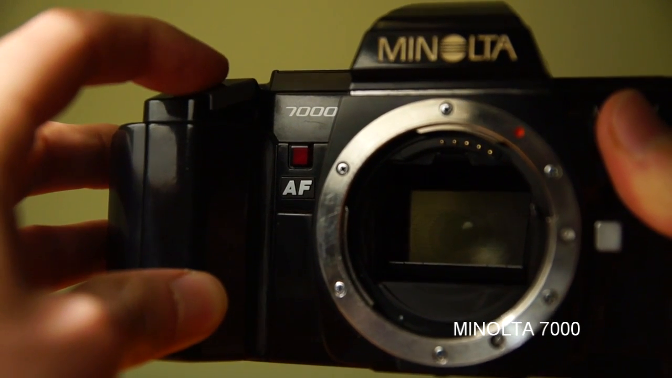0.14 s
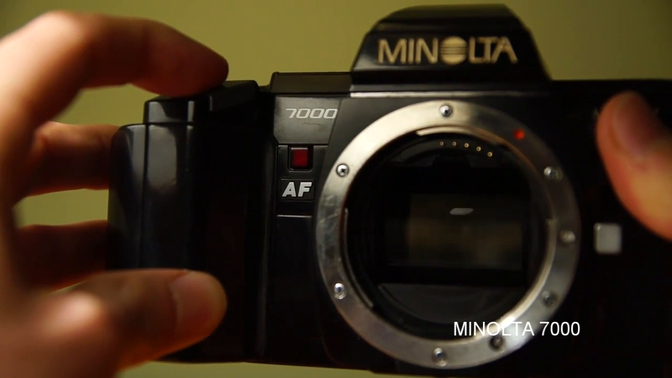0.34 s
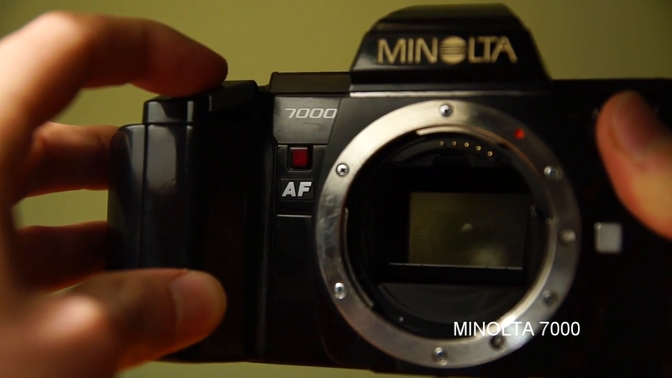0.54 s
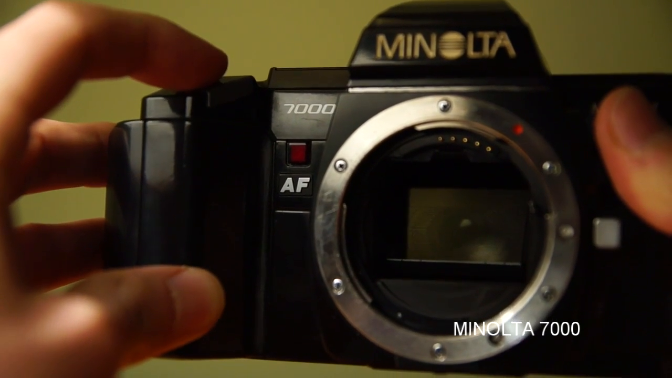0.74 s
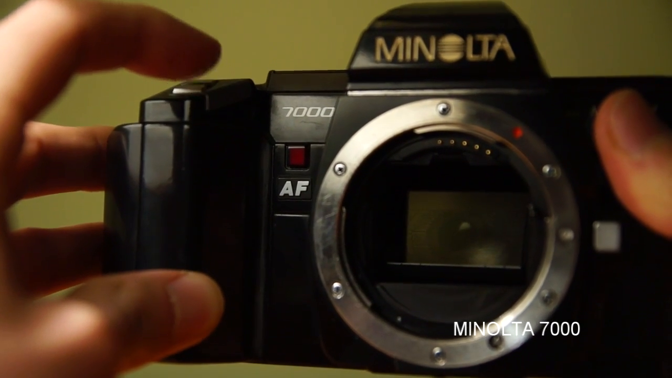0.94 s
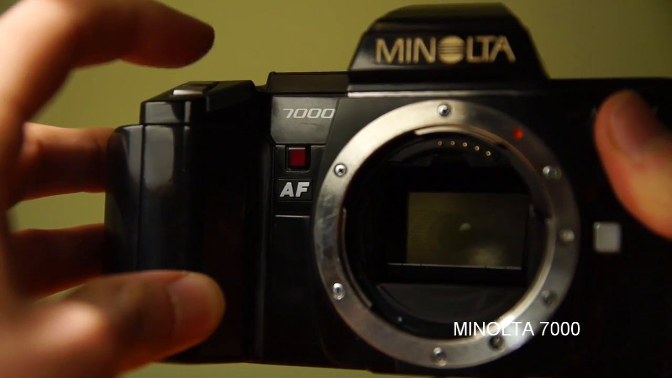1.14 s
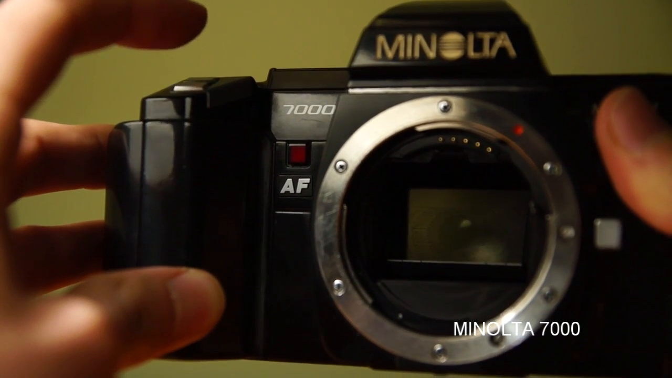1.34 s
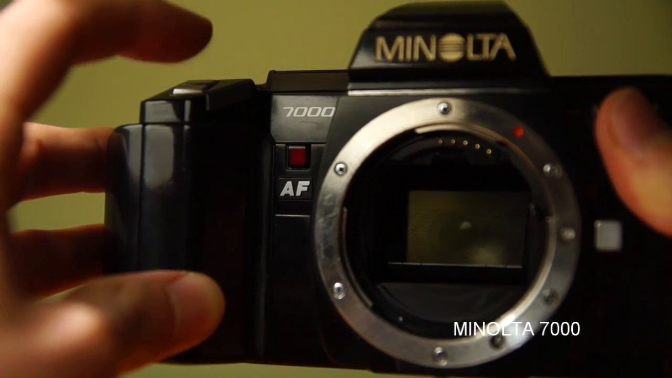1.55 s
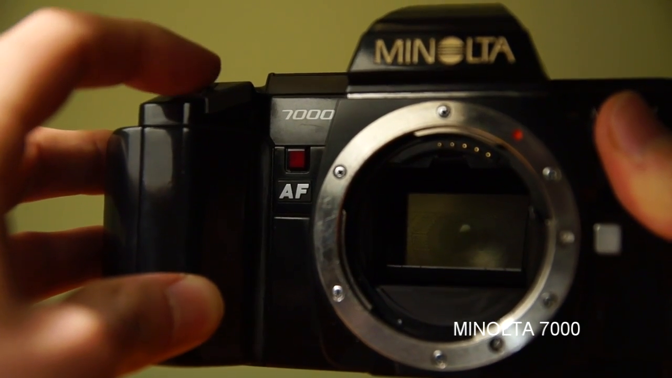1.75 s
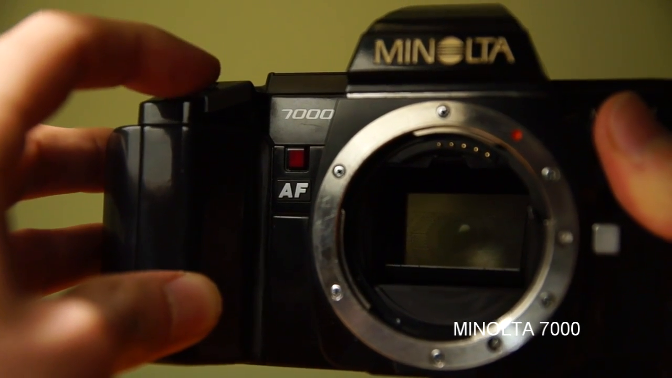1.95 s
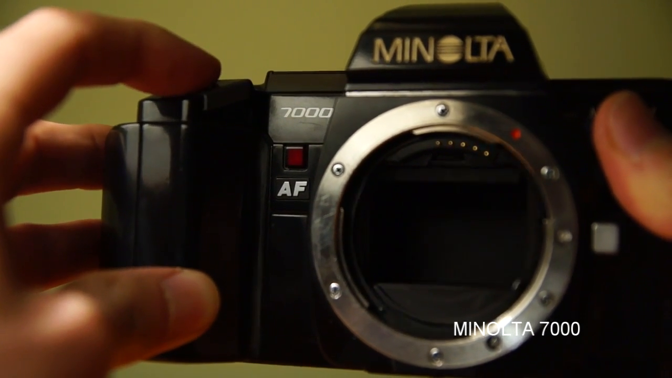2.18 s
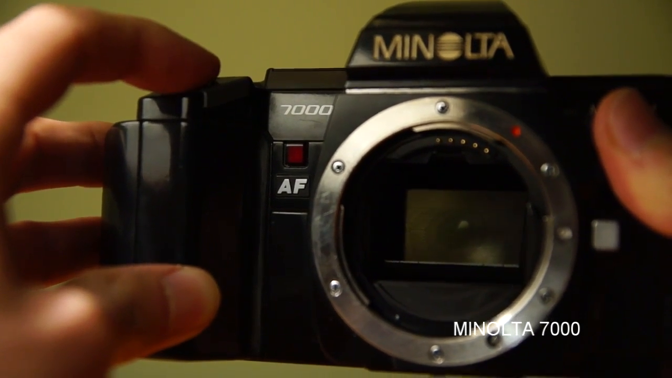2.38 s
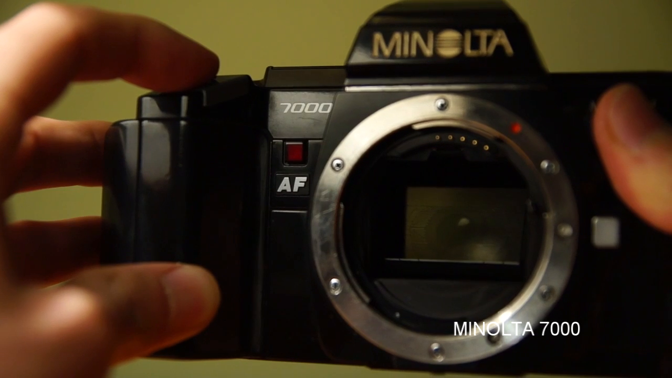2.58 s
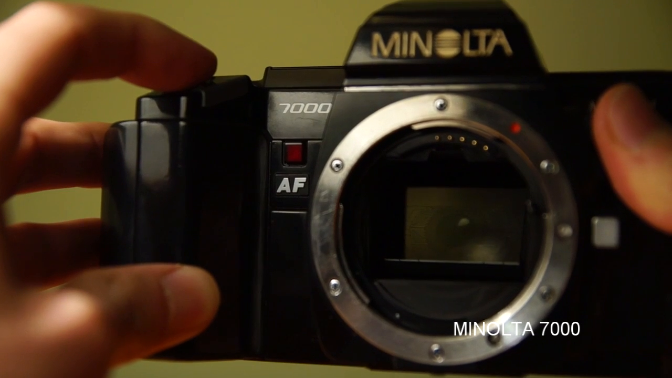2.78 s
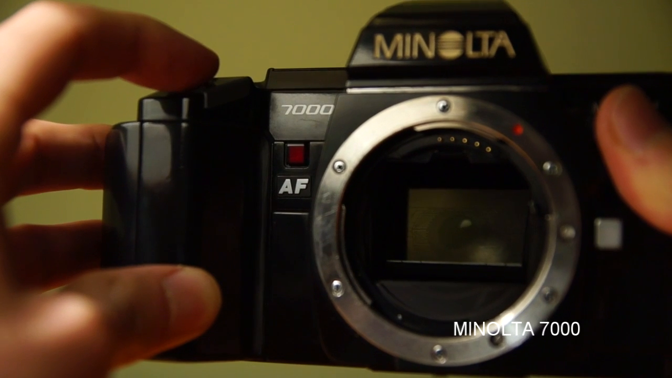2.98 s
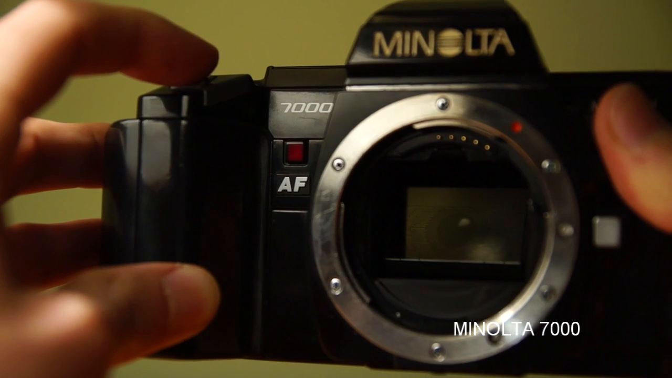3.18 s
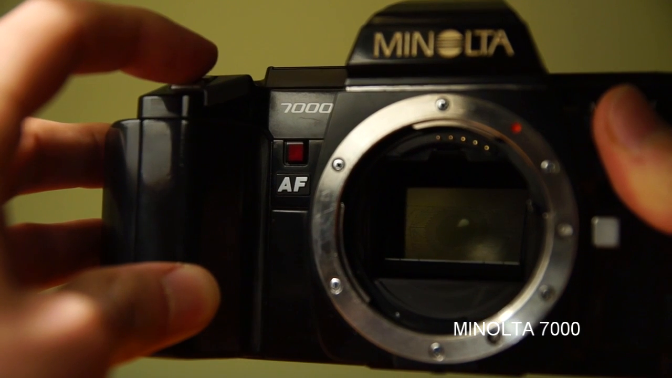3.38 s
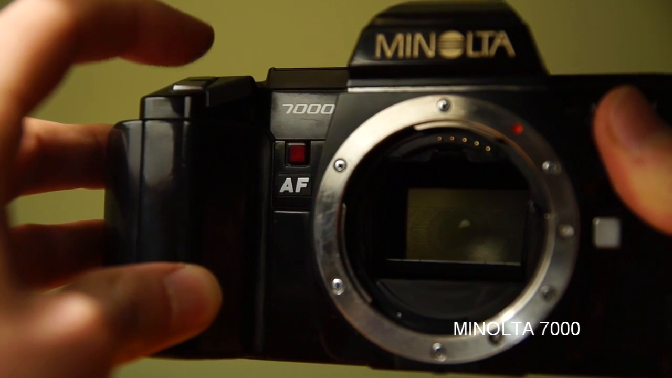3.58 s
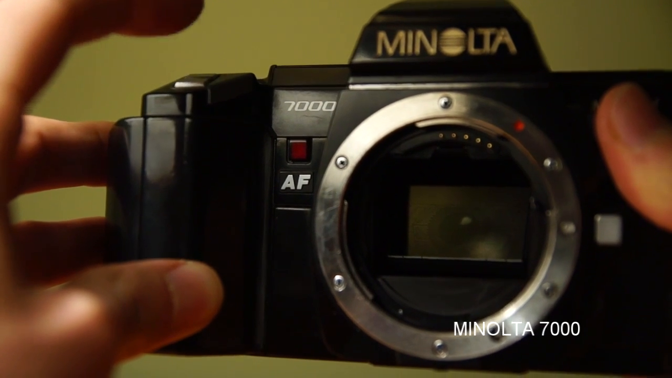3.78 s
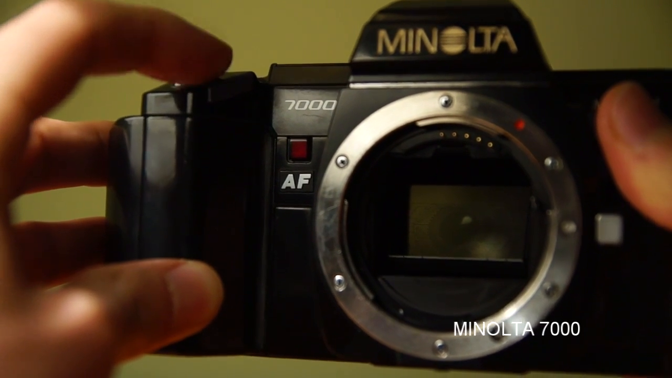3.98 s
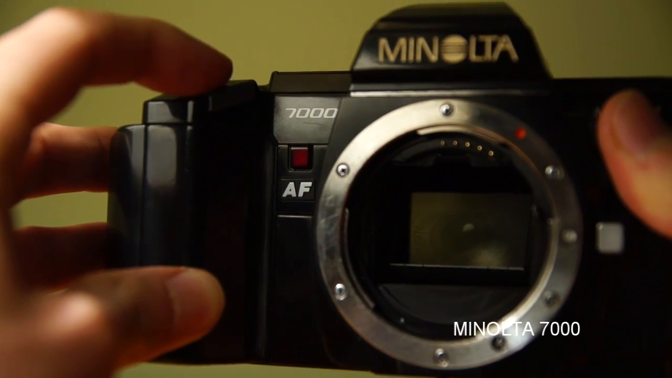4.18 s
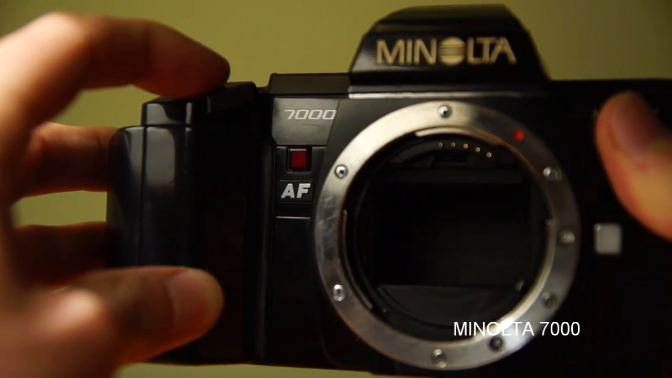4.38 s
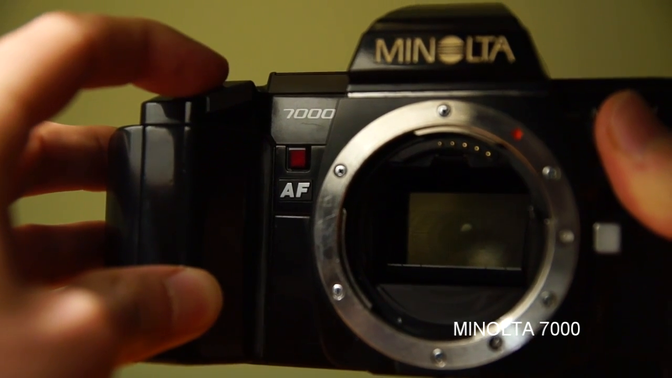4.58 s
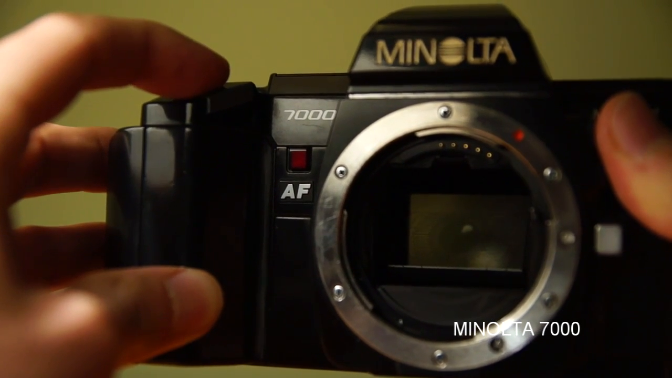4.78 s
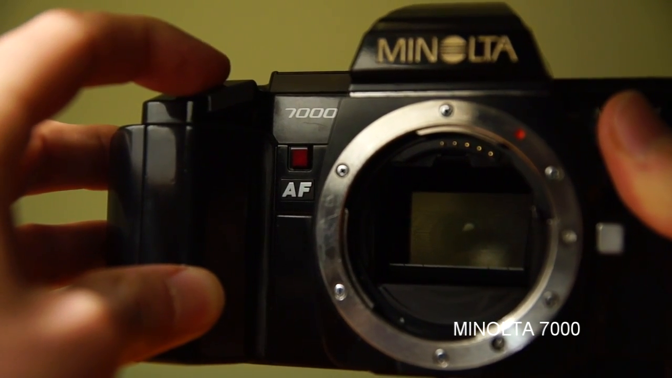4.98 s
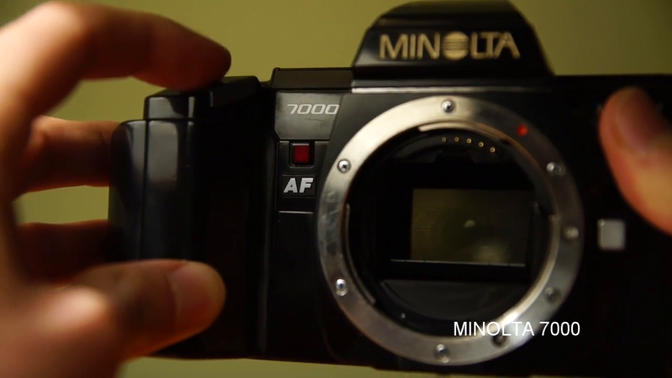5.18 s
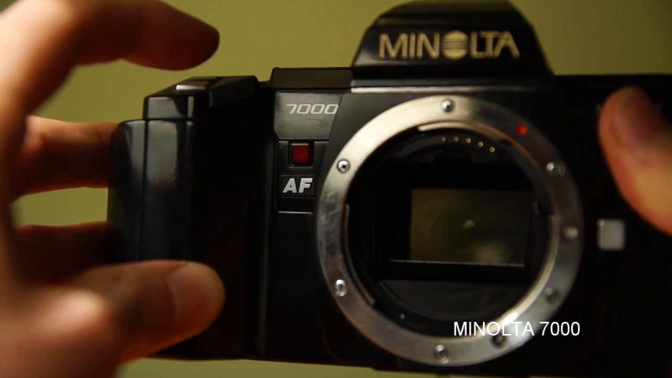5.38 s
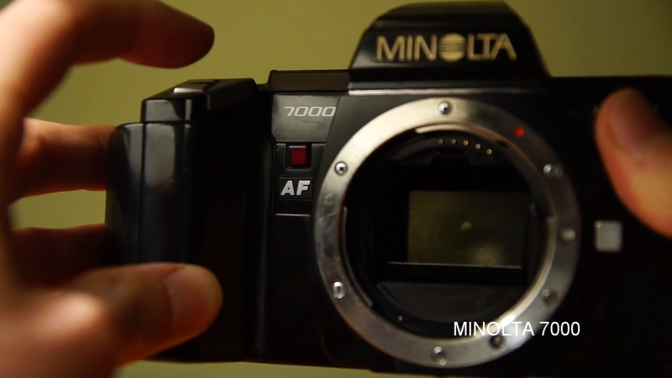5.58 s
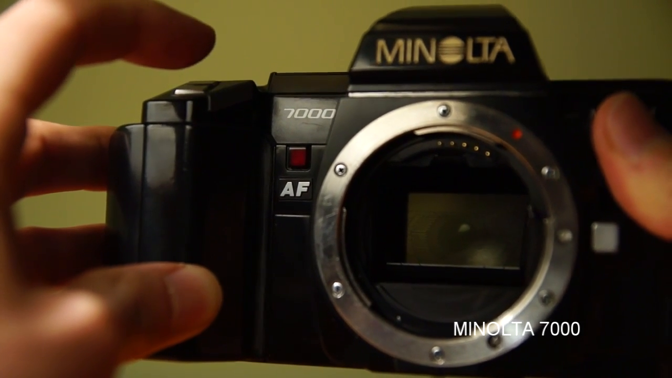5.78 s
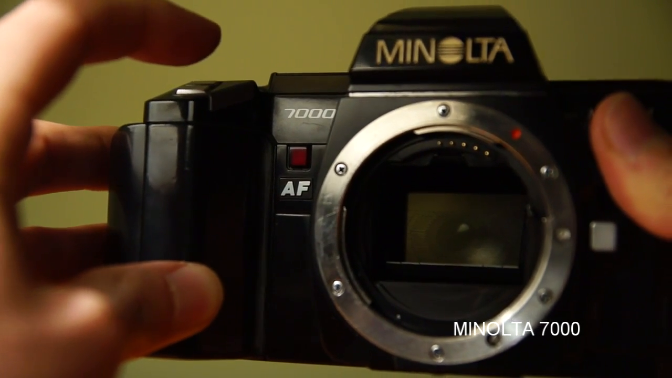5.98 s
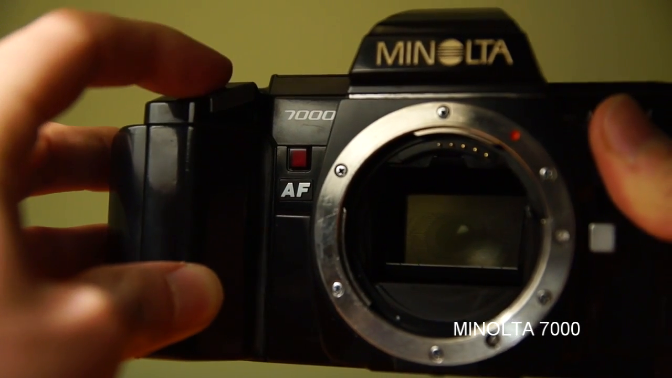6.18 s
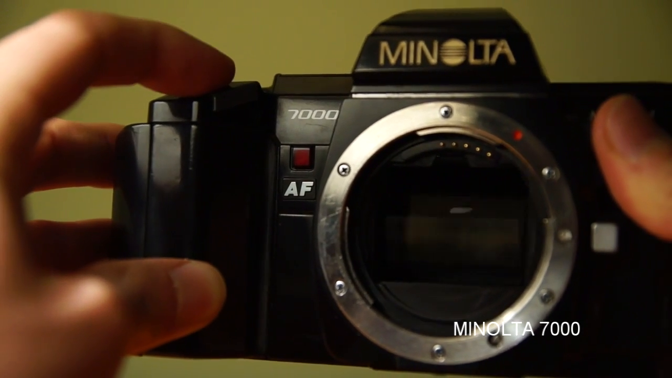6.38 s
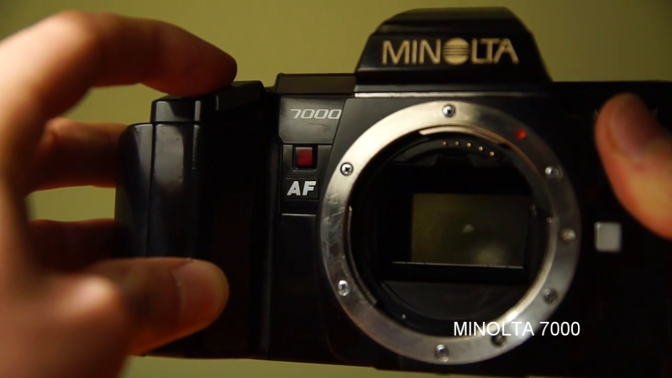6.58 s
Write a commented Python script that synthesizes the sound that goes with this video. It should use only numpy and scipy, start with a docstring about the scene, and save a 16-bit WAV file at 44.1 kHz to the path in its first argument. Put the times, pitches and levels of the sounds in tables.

```python
"""A motor-wound reflex camera with no lens is fired four times, close by in a quiet room.
Hiss and a faint rumble run throughout. In each release the gears lift the mirror, the shutter blinds snap,
the mirror drops, and the motor cocks the springs until they latch; two springs then sing on faintly.
Gears are noise shaped by the shell; parts are clicks and noise bursts that ring the chassis.
Between releases a fingertip makes small ticks on the button. Sparse random echoes make the room."""
import sys
import numpy as np
from scipy import signal
from scipy.fft import rfft, irfft, next_fast_len
from scipy.io import wavfile
from scipy.ndimage import uniform_filter1d

SR = 44100
rng = np.random.default_rng(int(sys.argv[2]) if len(sys.argv) > 2 else 0)


def waveform_to_disk(signal):
    """Save audio, clipped to [-1, 1], as 16-bit WAV at the path in sys.argv[1]."""
    frames = np.transpose(np.atleast_2d(signal))
    scaled = np.clip(frames, -1, 1) * 32767
    samples = np.round(scaled).astype(np.int16)
    wavfile.write(sys.argv[1], SR, samples)


N = 292824  # length in samples
SIZE = next_fast_len(N + SR)  # padded length for filtering
HZ = np.fft.rfftfreq(SIZE, 1 / SR)

# The four releases. Each row: shutter time in seconds, extra delay of the motor start in seconds,
# extra delay of the mirror drop in seconds, strength of the blows in dB, first and second spring level in dB.
RELEASES = [(.3417, -0.0031, 0.005, 0, -60, -59.5), (2.2694, -0.0012, 0.0033, -0.5, -67, -67),
            (4.447, -0.00051, .001, 0, -58.5, -65), (6.5309, -0.0024, -0.00049, 0, -62, -62)]
# The motor over one release. Each row: seconds from the shutter, gear level in dB,
# low range over the gear level in dB, whine pitch in Hz.
MOTOR = [(-.128, -72, 5, 4200), (-.09, -31.5, -2, 4900), (-.03, -24.5, -2.5, 4350), (-.012, -44.5, 6, 4300),
         (.02, -36.5, 1.5, 4200), (.035, -28, 1, 4250), (.05, -28, 3, 4350), (.07, -27.5, -1, 4814),
         (.095, -24.5, 3, 4585), (.112, -35.5, 6.5, 4200), (.26, -33.5, 1.5, 4084), (.285, -47, -6, 3810),
         (.35, -67, -17, 3960)]


def gain_of(db):
    """Turns decibels into a factor."""
    return 10 ** (np.asarray(db) / 20)


def evened(x):
    """Scales a signal to an RMS level of 1."""
    return x / np.sqrt(np.mean(x ** 2) + 1e-20)


def unit(response):
    """Scales a filter so that white noise keeps its level."""
    return response / np.sqrt(np.mean(abs(response) ** 2))


def read(points):
    """Reads a spectrum table at every frequency, in straight lines on a log axis."""
    f, value = np.transpose(points)
    return np.interp(np.log(HZ + 1), np.log(f + 1), value)


def shaped(x, response):
    """Filters a signal by multiplying its spectrum."""
    return irfft(rfft(x, SIZE) * response, SIZE)[..., :N]


def peak(hz, width):
    """A resonance with gain 1 at its centre, ringing only after it is struck."""
    return 1j * HZ * width / (hz ** 2 - HZ ** 2 + 1j * HZ * width)


def pair(same_points):
    """Two channels of white noise, more or less alike at each frequency."""
    a, b = rng.standard_normal((2, N))
    same = np.clip(read(same_points), 0, 1)
    right = shaped(a, same) + shaped(b, np.sqrt(1 - same ** 2))
    return np.array([a, right])


def timed(s, release):
    """Turns times from the shutter into clock times, with this release's own delays."""
    shutter, start_late, drop_late = release[:3]
    starting = s < -.07
    dropping = (s > .02) & (s < .04)
    return shutter + s + start_late * starting + drop_late * dropping


def each_release(rows):
    """Plays a one-release table at every release; also tells when a release is on."""
    s, *columns = np.transpose(rows)
    times = np.concatenate([timed(s, r) for r in RELEASES])
    t = np.arange(N) / SR
    on = sum((t > timed(s, r)[0]) & (t < timed(s, r)[-1]) for r in RELEASES)
    return on, [np.interp(t, times, np.tile(c, len(RELEASES))) for c in columns]


def hiss(level_db=-60):
    """Steady noise: room tone below, microphone hiss above."""
    # Spectrum before levelling. Each row: frequency in Hz, relative level in dB.
    colour = [(20, -27.5), (60, -42), (150, -20), (190, -10), (215, -2), (500, -1), (900, 0.5), (1800, -6),
              (4000, -6.5), (8000, -17), (14000, -23.5)]
    # Each row: frequency in Hz, left-right likeness from 0 to 1.
    likeness = [(100, 0.82), (300, 0.586), (700, 0.21), (3000, 0.14), (10000, .03)]
    return gain_of(level_db) * evened(shaped(pair(likeness), gain_of(read(colour))))


def rumble(hum_hz=226.1, hum_db=-78, bumps_db=-83, lumps_per_s=9, half_lump_s=0.023):
    """A faint wavering hum from narrow noise, and low bumps of noise that come and go."""
    hum = shaped(rng.standard_normal(N), peak(hum_hz, 5.66))
    starts = (rng.random(N) < lumps_per_s / SR) * rng.uniform(.4, 1, N)
    lumps = signal.oaconvolve(starts, np.hanning(2 * int(half_lump_s * SR)))[:N]
    swell = lumps + 0.089  # never quite silent
    bumps = shaped(swell * rng.standard_normal(N), 1 / (1 + (HZ / 150) ** 6))
    return gain_of(hum_db) * evened(hum) + gain_of(bumps_db) * evened(bumps)


def room(x, gap=300, spacing=20):
    """Sparse echoes of random sign (gap, spacing in samples); each band dies at its own speed."""
    # Each row: frequency in Hz, seconds to fall by 60 dB.
    decay_times = [(300, 0.21), (800, 0.33), (2000, 0.23), (5500, 0.22), (12000, 0.18)]
    taps = np.zeros((2, SR // 2))
    at = np.arange(gap, SR // 2 - spacing, spacing).astype(int)
    at = at + rng.integers(0, spacing, (2, len(at)))
    np.put_along_axis(taps, at, rng.choice([-1., 1.], at.shape), 1)
    taps[1] = 0.46 * taps[0] + 0.9 * taps[1]  # the two sides are partly alike
    hz, t, bands = signal.stft(taps, SR, nperseg=256)
    t60 = np.interp(hz, *np.transpose(decay_times))[:, None]
    tail = signal.istft(bands * gain_of(-60 * t / t60), SR, nperseg=256)[1]
    return signal.fftconvolve(x, tail / np.linalg.norm(tail[0]), axes=1)[:, :N]


def finger(width=800, hollow_hz=2850, dull_hz=1900):
    """Small plastic ticks: fading noise through a hollow ring and a dull body, plus a thin bright edge."""
    # Levels are those of the noise before filtering. Each row: start in seconds, ring level in dB,
    # fading time in seconds, edge level in dB, dull body level in dB.
    ticks = [(0.9714, -44, 0.004, -75, -58), (2.707, -33, 0.0033, -72, -38), (2.846, -51, 0.004, -72, -49),
             (3.1572, -43, 0.0032, -55, -54), (3.4615, -45, 0.0043, -73, -55),
             (4.8536, -30.5, 0.0045, -55, -34), (5.131, -45, 0.004, -74, -47),
             (5.2714, -41, 0.0037, -71, -48), (5.288, -34, 0.0056, -71, -45),
             (6.181, -39, 0.0046, -75, -56)]
    out, t = np.zeros((2, N)), np.arange(1500) / SR
    noise = rng.standard_normal((len(ticks), 2, len(t)))
    hollow, dull = (signal.iirpeak(f, f / width, SR) for f in (hollow_hz, dull_hz))
    for (s, ring_db, fade, edge_db, body_db), (a, b) in zip(ticks, noise):
        rub = np.array([a, 0.86 * a + 0.65 * b]) * np.exp(-t / abs(fade))
        # each filter is used twice to sharpen it
        ring, body = (signal.lfilter(*f, signal.lfilter(*f, rub)) for f in (hollow, dull))
        edge = np.diff(rub, prepend=0)
        tick = gain_of(ring_db) * ring + gain_of(body_db) * body + gain_of(edge_db) * edge
        out[:, round(s * SR):][:, :len(t)] += tick
    return out


def springs(latch_s=.264):
    """Two thin tones, plucked by the last latch, that die slowly after each release."""
    # Each row: frequency in Hz, seconds to fall by 60 dB.
    tones = [(979, 1.2), (1243.5, 1.5)]
    out, t = np.zeros(N + 2 * SR), np.arange(SR) / SR
    for release in RELEASES:
        start = round((release[0] + latch_s) * SR)
        for db, (hz, t60) in zip(release[4:], tones):
            tone = np.sin(2 * np.pi * (hz * t + rng.random()))
            out[start:][:SR] += gain_of(db - 60 * t / t60) * tone
    return out[:N]


def shutter_hum(waver_hz=12):
    """A very short, faint low tone just after the shutter, its pitch wavering slightly."""
    # One row: start and stop in seconds from the shutter, fade in seconds, pitch in Hz, full level in dB.
    start, stop, fade, hz, db = (0, 0.0164, 0.13, 525, -51)
    # the fades are longer than the tone and overlap, so it stays well below its full level
    on, (swell,) = each_release([(start, 0), (start + fade, 1), (stop - fade, 1), (stop, 0)])
    waver = evened(uniform_filter1d(rng.standard_normal(N), size=1500))
    turns = 2 * np.pi * np.cumsum(hz + waver_hz * waver) / SR
    return gain_of(db) * on * swell * np.sqrt(2) * np.sin(turns)


def whine(width=250, level_db=-6.5, per_khz_db=12):
    """Slow noise carried on the motor's moving pitch, louder as the pitch climbs."""
    on, (gear_db, _, hz) = each_release(MOTOR)
    a, b = shaped(rng.standard_normal((2, N)), 1 / (1 + (HZ / width) ** 2))
    turns = 2 * np.pi * np.cumsum(hz) / SR
    # level_db is over the gear level, at a pitch of 5 kHz
    level = gain_of(gear_db + level_db + per_khz_db * (hz / 1000 - 5.0))
    return on * level * evened(a * np.cos(turns) + b * np.sin(turns))


def gears(teeth_per_s=900, ring_s=0.00091, smooth=3.4):
    """Low, middle and top envelopes of a dense whirr, roughened where single teeth meet."""
    teeth = (rng.random(N) < teeth_per_s / SR) * rng.exponential(1, N)
    clatter = signal.lfilter([1], [1, -np.exp(-1 / (ring_s * SR))], teeth)
    grain = evened(clatter) + smooth
    on, (db, low_db, _) = each_release(MOTOR)
    return on * gain_of([db + low_db, db, db - 5]) * evened(grain)


def knocks(rise=0.24, decay_power=0.92, spread_db=1.7, blow_lag=.35):
    """Each part lands with one blow and rattles briefly; gives both in low, middle and top ranges."""
    # In order: button bottoms, motor engages (2 rows), mirror swings up to its stop (2),
    # blinds and bounce (3), mirror drops and bounces (2), cocking lever takes the load (2), pawl,
    # shutter springs latch (3), mirror spring latches (2).
    # Each row: seconds from the shutter, thud, clack and tick level in dB, rattle time in seconds,
    # blow over the rattle in dB, before the tilt between ranges.
    parts = [(-.1205, -49, -51.5, -55, .004, 6), (-.112, -32, -33.5, -39, .0047, 2.5),
             (-.098, -47, -35, -42.5, .0046, 2.5), (-.0453, -32, -31, -22, .006, -3.5),
             (-.036, -32, -22, -30, .0045, 8), (-.0073, -23, -20.5, -18, .0053, 4),
             (-.0008, -29.5, -12, -20, .0031, 8.5), (.0087, -37, -39, -31.5, 0.0029, -4),
             (.0272, -24.5, -14.5, -24, .0065, 7), (.043, -21.5, -31, -34.5, 0.0045, 8.5),
             (0.0815, -15.5, -16, -19, 0.0034, 8), (0.0906, -31, -25.5, -24, 0.0051, -3.5),
             (0.185, -29.5, -20, -21.5, .0021, 2), (.2252, -23, -14.5, -16.5, 0.0028, 9.5),
             (.2285, -25.5, -15, -15.5, 0.0035, 3.5), (.2344, -24, -33, -38, .0037, -2),
             (0.256, -24, -26.5, -48, .0045, 0), (0.263, -19, -27.5, -46, 0.0044, 3)]
    rattles, blows = np.zeros((3, N + SR)), np.zeros((3, N + SR))
    t = np.arange(2000) / SR
    chance = rng.standard_normal((len(RELEASES), len(parts), 3, 1))
    for release, lucks in zip(RELEASES, chance):
        for (s, thud_db, clack_db, tick_db, rattle, blow_db), luck in zip(parts, lucks):
            # no two blows are quite alike
            levels = gain_of([[thud_db], [clack_db], [tick_db]] + spread_db * luck + release[3])
            lengths = abs(rattle) * np.array([[1.15], [1], [.8]])  # low rattles last longest
            growth = 1 - np.exp(-t / (rise * lengths))
            decay = np.exp(-(t / lengths) ** decay_power)
            at = round(timed(s, release) * SR)
            rattles[:, at:at + len(t)] += levels * growth * decay
            # the blow lands a share of the rattle time after first contact
            blows[:, at + round(blow_lag * abs(rattle) * SR)] += levels[:, 0] * gain_of(blow_db)
    return rattles[:, :N], blows[:, :N]


def camera(blow_tilt_db=(3., 0., -6.), gear_low_hz=500):
    """In three ranges, the gears shake the shell while rattles and blows ring the chassis."""
    # Spectra of the low, middle and top range. Each row: frequency in Hz, relative level in dB.
    thud, clack, tick = [(20, -17), (200, -36), (500, -19.5), (900, -9.5), (1600, -6.5), (2400, -4.5),
                         (3200, -7), (6000, -46.5)], [(800, -33), (2000, -24.5), (2800, -8), (4200, 1), (5200, -5.5),
                                       (6500, -11.5), (10000, -44)], [(2000, -40), (5000, -6.5), (6500, -5), (8000, -6),
                                                      (9500, -7.5), (11000, -8), (14000, -9.5)]
    # What the shell, then the metal chassis, rings with. Each row: frequency in Hz,
    # width of the resonance in Hz (the chassis squares it, so narrower), level over the broad response in dB.
    shell_modes, chassis_modes = [(1030, 90, -5), (1178, 43, 4.5), (1560, 62, 6.5), (1854, 75, 4.5),
                                  (2250, 96, 4), (2720, 85, 2), (3024, 110, 4.5), (4020, 156, 1.5),
                                  (4260, 180, 2), (4950, 43, -5.5), (5140, 100, 3), (6690, 350, 4.5)], [(380, 120, 3), (920, 170, 0), (1803, 340, 7),
                                                (3100, 340, 1.5), (4194, 490, 6), (4820, 560, 5),
                                                (6650, 740, 0)]
    # Each row: frequency in Hz, left-right likeness from 0 to 1.
    likeness = [(300, 1), (1800, 0.78), (2600, 0.25), (4200, 0.59), (5500, 0.44), (9000, 0.072)]
    # Each row: frequency in Hz, left minus right in dB.
    lean = [(60, 0), (120, 2.5), (240, 0), (470, 1), (930, 1.5), (1860, 0.0), (3690, 1.5), (7330, 0),
            (14600, -1)]
    rattles, blows = knocks()
    shell = 1 + sum((gain_of(db) - 1) * peak(hz, width) for hz, width, db in shell_modes)
    chassis = 1 + sum((gain_of(db) - 1) * peak(hz, width) ** 2 for hz, width, db in chassis_modes)
    gear_low_cut = HZ ** 2 / (HZ ** 2 + gear_low_hz ** 2)
    out = (whine() + shutter_hum()) * np.ones((2, 1))
    ranges = zip(gears(), rattles, blows, blow_tilt_db, (thud, clack, tick))
    for whirr, rattle, blow, tilt_db, colour in ranges:
        broad, noise = gain_of(read(colour)), pair(likeness)
        out += shaped(whirr * noise, unit(broad * shell) * gear_low_cut)
        # the gears' noise, played backwards in time, sets the rattle's noise apart
        struck = rattle * noise[:, ::-1] + gain_of(tilt_db) * blow
        out += shaped(struck, unit(broad * chassis))
    return shaped(out, gain_of(np.array([[.5], [-.5]]) * read(lean)))


def scene():
    """Camera and fingertip with their room echo, over springs, hiss and rumble."""
    near = camera() + finger()
    return near + gain_of(-10.5) * room(near) + springs() + hiss() + rumble()


def record(dry, shelf_hz=14060, shelf_db=-33, offset=-.00244, edge_hz=15165):
    """The recorder: dips in the response, a treble shelf, a small offset, then the band limit."""
    # Narrow dips. Each row: frequency in Hz, width in Hz, depth in dB.
    notches = [(130, 54.5, -2), (608, 120, -11.5), (1373, 334, -12.5), (2374, 503, -17.5), (3483, 590, -13)]
    dips = np.prod([1 - (1 - gain_of(db)) * peak(hz, width) for hz, width, db in notches], axis=0)
    shelf = gain_of(shelf_db / (1 + np.exp((shelf_hz - HZ) / 25)))  # little gets through above it
    coloured = shaped(dry, dips * shelf) + offset
    band_limit = signal.firwin(511, edge_hz, window=("kaiser", 9), fs=SR)
    return signal.oaconvolve(coloured, band_limit[None], "same")


dry = scene()
out = record(dry)
waveform_to_disk(out)
```